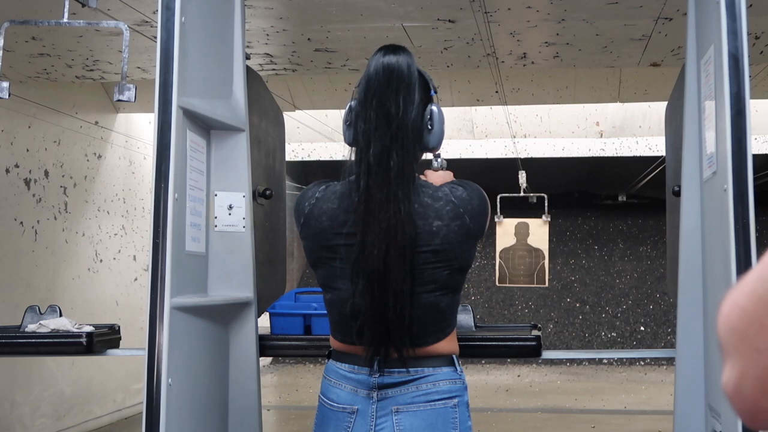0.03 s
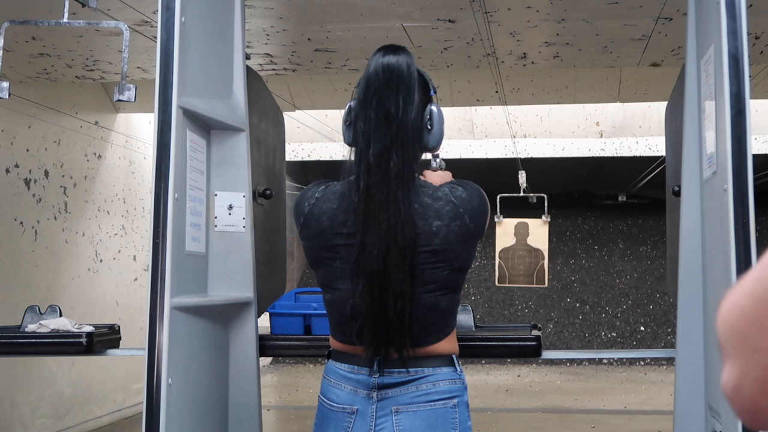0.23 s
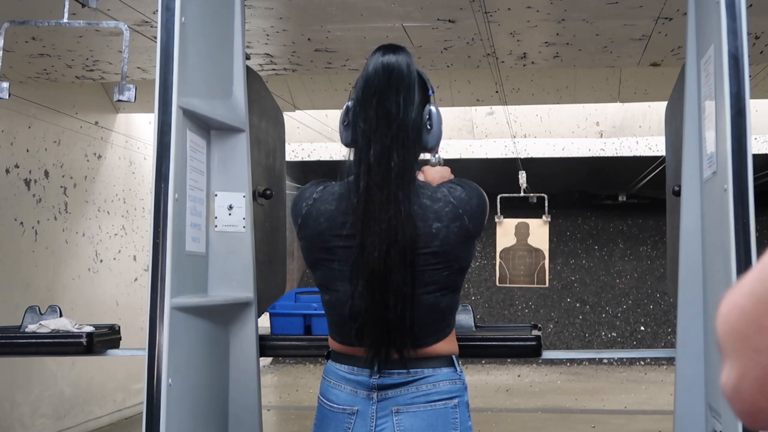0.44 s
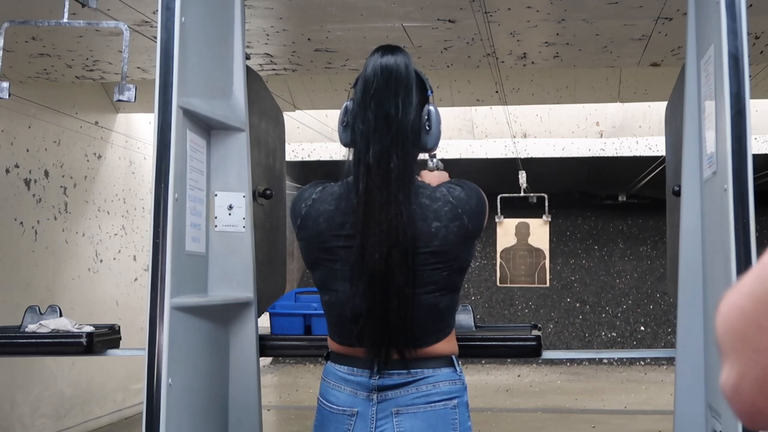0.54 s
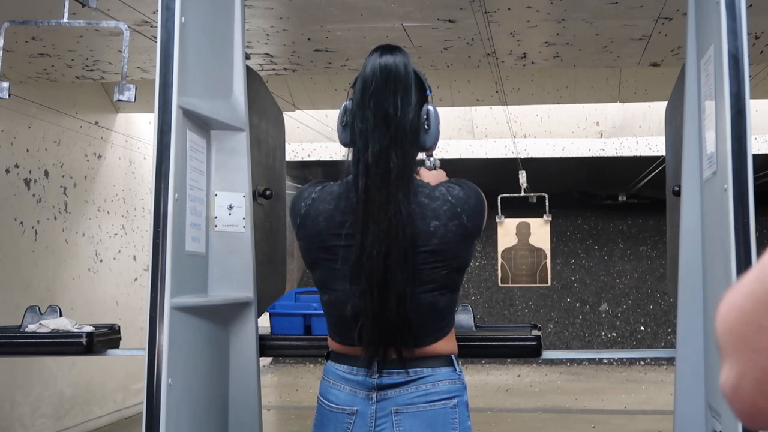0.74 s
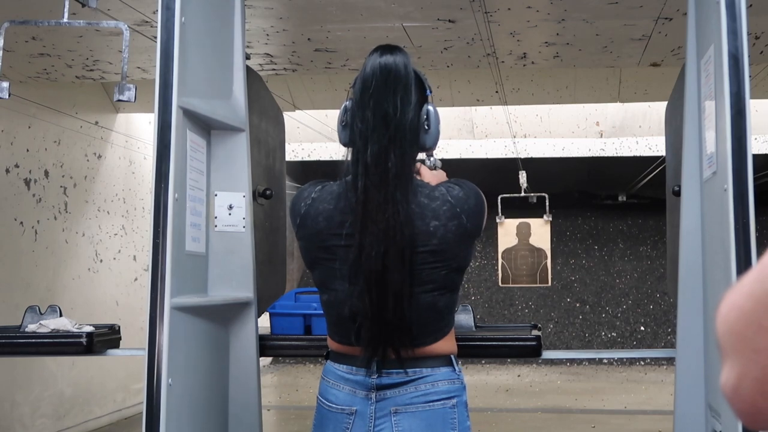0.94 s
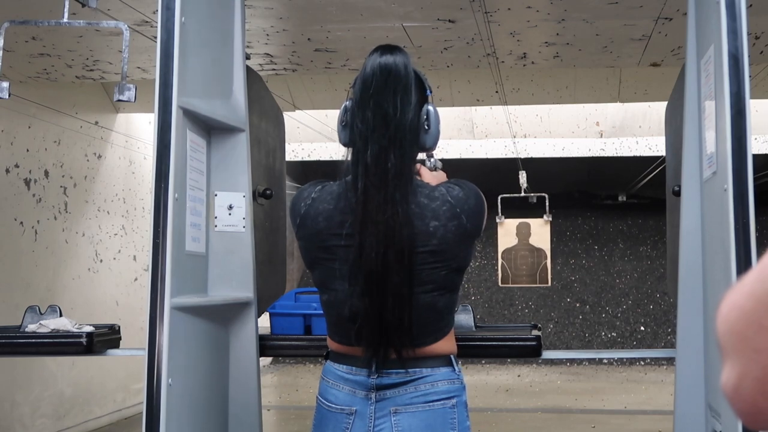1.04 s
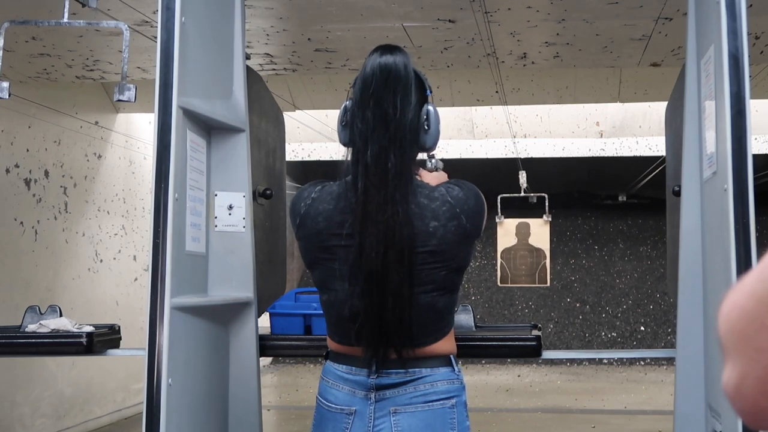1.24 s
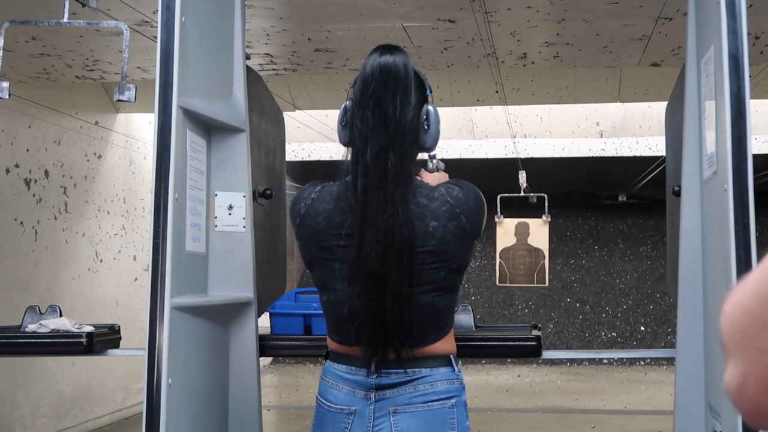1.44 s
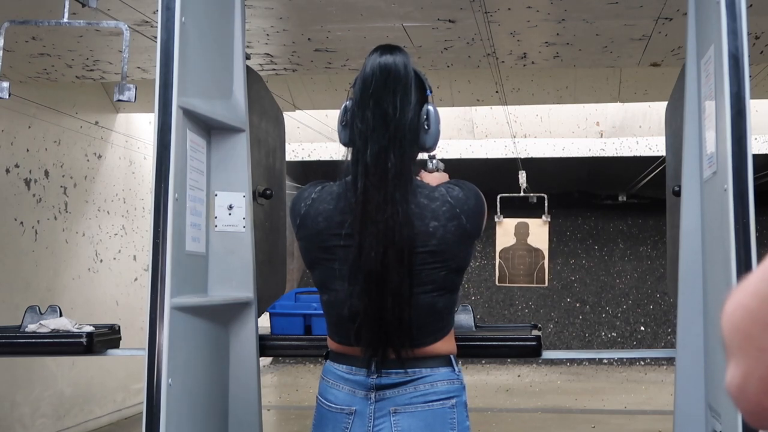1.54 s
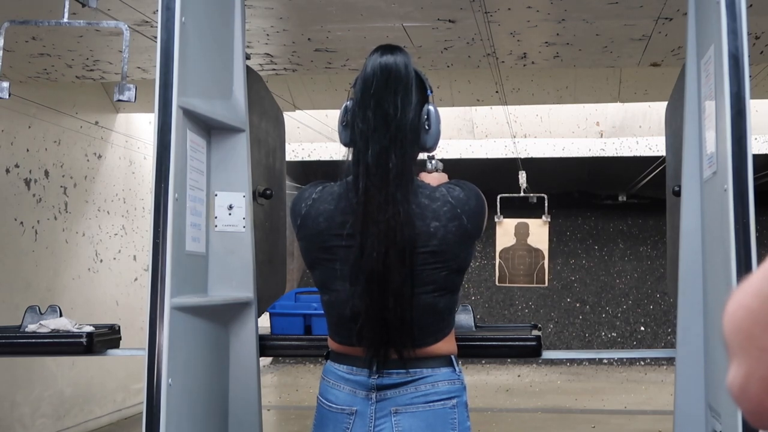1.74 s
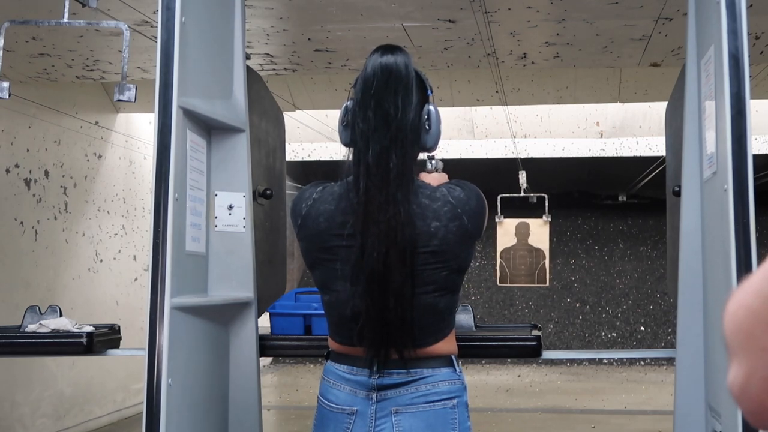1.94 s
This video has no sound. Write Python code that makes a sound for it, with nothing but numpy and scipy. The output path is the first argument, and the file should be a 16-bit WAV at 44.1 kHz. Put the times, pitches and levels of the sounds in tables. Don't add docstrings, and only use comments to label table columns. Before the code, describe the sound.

A single overloaded handgun shot cracks in a concrete indoor range, followed by a fading roar

```python
import sys
import numpy as np
from scipy import signal
from scipy.io import wavfile

SR = 44100
rng = np.random.default_rng(int(sys.argv[2]) if len(sys.argv) > 2 else 0)


def wrap_up_sound(samples):
    columns = np.atleast_2d(samples).T
    tamed = np.clip(columns, -1, 1)
    steps = np.round(tamed * 32767).astype(np.int16)
    wavfile.write(sys.argv[1], SR, steps)


def volts_from_db(level):
    exponent = np.asarray(level, float) / 20
    return 10 ** exponent


N = 88200

SHOT_S, CRACK_S = 0.3818, 0.0115
FLOOR_TOP_HZ = 8000
# hz, correlation [-1..1]
LIKENESS = [(200, 1), (400, 1), (700, 0.99), (1300, .9), (2400, 1), (4400, 0.26), (8000, -.4),
            (15000, 0.28)]


def rms_one(x):
    return x / np.sqrt(np.mean(x ** 2) + 1e-20)


def at_hz(points, hz, column=1):
    points = np.array(points)
    return np.interp(np.log(hz), np.log(points[:, 0]), points[:, column])


def drift(rate_hz):
    r = np.exp(-40 * np.pi * rate_hz / SR)
    white = rng.standard_normal(N // 20 + 2002)
    slow = signal.lfilter([1], [1, -2 * r, r * r], white)[2000:]
    return np.interp(np.arange(N) / 20, np.arange(len(slow)), rms_one(slow))


def ring(start_s, level_db, hz, t60_s):
    t = np.maximum(np.arange(N) / SR - start_s, 0)
    return volts_from_db(level_db - 60 * t / t60_s) * np.sin(2 * np.pi * hz * t)


def dying(start_s, t60_s, rise_s):
    t = np.arange(N) / SR - start_s
    rise = np.sin(np.pi / 2 * np.clip(t / rise_s, 0, 1)) ** 2
    return rise * volts_from_db(-60 * np.maximum(t, 0) / t60_s)


def band_pass(x, order, low_hz, high_hz):
    return signal.sosfilt(signal.butter(order, [low_hz, high_hz], "band", fs=SR, output="sos"), x)


def low_pass(x, hz):
    return signal.sosfilt(signal.cheby2(10, 40, hz * 1.1, fs=SR, output="sos"), x)


def narrow(x, hz):
    mid = x.mean(axis=0)
    return x - mid + low_pass(mid, hz)


def banded_noise(spectrum, likeness, patchy_db, shape=lambda hz: 1):
    out, power = 0, 0
    together = drift(25)
    edges_hz = 25 * 2 ** np.arange(0, 9.7, 0.5)
    white = rng.standard_normal((2, 2, N))
    for k, (low_hz, high_hz) in enumerate(zip(edges_hz, edges_hz[1:])):
        mid, side = band_pass(white[k % 2], 4, low_hz, high_hz)
        hz = np.sqrt(low_hz * high_hz)
        alike = np.clip(at_hz(likeness, hz), -1, 1)
        gain = volts_from_db(at_hz(spectrum, hz))
        power += gain ** 2 * (high_hz - low_hz) / SR * 4.4
        stereo = np.sqrt(1 + alike) * mid + np.sqrt(1 - alike) * side * [[1], [-1]]
        flicker = volts_from_db(patchy_db * (1.04 * together + drift(45)))
        out = out + gain * shape(hz) * flicker * stereo
    return out / np.sqrt(power)


def ventilation():
    # hz, level_db_per_hz
    air_spectrum = [(20, -17.5), (144, -8), (301, -16), (761, -19.5), (1160, -28), (4000, -37.5),
                    (7000, -49), (12000, -49.5)]
    # hz, level_db_per_hz
    hiss_spectrum = [(1500, -30.5), (3000, -6), (8000, 2.5), (14500, -3), (17000, -37.5)]
    air_db, hiss_db, hiss_top_hz = -28, -46.5, 12000
    duct_hz, duct_width_hz, duct_db = 135, 8.3, -37.5
    gain_drop_db, recovery_db_per_s = -34, 5

    t = np.arange(N) / SR - SHOT_S
    gain_db = np.where(t < CRACK_S, 0, gain_drop_db + recovery_db_per_s * t)
    r = np.exp(-np.pi * duct_width_hz / SR)
    poles = [1, -2 * r * np.cos(2 * np.pi * duct_hz / SR), r * r]
    duct = rms_one(signal.lfilter([1, 0, -1], poles, rng.standard_normal(N)))
    air = volts_from_db(air_db) * banded_noise(air_spectrum, LIKENESS, patchy_db=0.37) + volts_from_db(duct_db) * duct
    hiss = volts_from_db(hiss_db) * narrow(banded_noise(hiss_spectrum, LIKENESS, patchy_db=1.5), hiss_top_hz)
    return hiss * (t < 0) + volts_from_db(gain_db) * narrow(air, FLOOR_TOP_HZ)


def thuds():
    # start_s, burst_db, tail_t60_s, boom_hz, boom_db
    hits = [
        (0.187, -29.5, 0.9, 140, -14),
        (0.209, -31.5, 0.6, 132.5, -16),
        (.289, -24.5, 0.59, 882, -17),
        (0.326, -37, 0.22, 140, -24),
        (1.126, -42, .3, 1700, -58),
        (1.2225, -36, 1.3, 232.4, -26.5),
        (1.25, -89, .5, 135, -35.5),
        (1.6321, -55.5, 0.14, 902, -45),
    ]
    # hz, level_db_per_hz
    thud_spectrum = [(100, -22), (250, 6), (1200, -8.5), (2300, -11), (4500, -27.5), (7000, -38),
                     (14000, -43)]
    # hz, level_db_per_hz
    far_spectrum = [(40, -32), (113, -10), (349, -0.5), (955, -14.5), (2450, -13.5), (5500, -28),
                    (9000, -34), (15000, -48)]
    tail_db, head_t60_s, boom_cycles = -11, 0.15, 30
    far_s, far_db, far_t60_s = 1.842, -46, 1.2
    far_boom_hz, far_boom_db = 108.5, -39.5

    bursts, booms = 0, 0
    for start_s, burst_db, t60_s, boom_hz, boom_db in hits:
        tail = volts_from_db(tail_db) * dying(start_s, t60_s, 0.0049)
        head = dying(start_s, head_t60_s, 0.00033)
        bursts = bursts + volts_from_db(burst_db) * (tail + head)
        boom = ring(start_s, boom_db, boom_hz, boom_cycles / boom_hz)
        booms = booms + boom * dying(start_s, 100, 3.4 / boom_hz)
    wash = banded_noise(far_spectrum, LIKENESS, patchy_db=1.5)
    far = volts_from_db(far_db) * dying(far_s, far_t60_s, 0.002) * wash
    far_boom = ring(far_s - 0.004, far_boom_db, far_boom_hz, 0.19)
    body = banded_noise(thud_spectrum, LIKENESS, patchy_db=1.0)
    return narrow(bursts * body + booms + far + far_boom, FLOOR_TOP_HZ)


def case():
    # start_s, tick_db, ring_db
    bounces = [
        (1.126, -46.5, -82),
        (1.2233, -43.5, -95),
        (1.4919, -69, -66.5),
        (1.528, -77, -70),
        (1.6327, -53.5, -81),
        (1.688, -58, -73.5),
        (1.844, -55, -78),
        (1.864, -58.5, -84),
    ]
    # hz, level_db, t60_s
    brass_modes = [
        (11430, 6.5, 0.6),
        (11500, -1, .5),
        (11000, -20, .3),
    ]
    tick_low_hz, tick_top_hz, tick_t60_s, tick_width = 1100, 5000, 0.08, 0.3
    left_db, right_db, tumble_db = 1.5, -14, 3.5

    mid, side = band_pass(rng.standard_normal((2, N)), 3, tick_low_hz, tick_top_hz)
    strikes, rings = 0, 0
    for start_s, tick_db, ring_db in bounces:
        strikes = strikes + volts_from_db(tick_db) * dying(start_s, tick_t60_s, 0.0012)
        for hz, level_db, t60_s in brass_modes:
            rings = rings + ring(start_s, ring_db + level_db, hz, t60_s) * dying(start_s, 100, 0.002)
    ticks = (mid + tick_width * side * [[1], [-1]]) * strikes
    tumble = volts_from_db([left_db + tumble_db * drift(34), right_db + tumble_db * drift(18)])
    return narrow(ticks, 13000) + rings * tumble


def hall():
    # start_s, left_db, right_db
    wall_slaps = [
        (0.4261, -17.5, -30),
        (0.4343, -0.5, -6.5),
        (0.4371, -4.5, -13.5),
        (0.4437, -12.5, -8.5),
    ]
    # left_hz, right_hz, level_db, t60_s
    slap_modes = [
        (388, 400, -3, 0.17),
        (313.2, 240, -5, 0.078),
        (140, 140, -11.5, 0.15),
    ]
    # hz, level_db_per_hz
    roar_spectrum = [(30, -26), (100, -15), (444, -1), (810, -2.5), (1210, -12), (3300, -10), (4300, -24.5),
                     (8000, -29.5), (15000, -46)]
    # hz, t60_s
    roar_t60 = [(40, .4), (130, 0.47), (300, 1.053), (600, 1.08), (1500, 0.94), (3200, 0.75), (5500, 0.44),
                (8000, 0.37), (13000, 0.37)]
    # hz, start_s, rise_s
    opens = [(60, .432, .004), (495, .445, 0.024), (1500, 0.4434, 0.027), (10060, .448, 0.0083)]
    # hz, close_s
    centre_closes = [
        (12000, .47),
        (9500, .5),
        (7800, .54),
    ]
    roar_db, roar_s = -12.5, 0.51

    slaps = np.zeros((2, N))
    for start_s, *side_db in wall_slaps:
        for *side_hz, level_db, t60_s in slap_modes:
            for c in range(2):
                slaps[c] += ring(start_s, side_db[c] + level_db, side_hz[c], t60_s)
    slaps = signal.sosfilt(signal.butter(2, 900, fs=SR, output="sos"), slaps)

    def shape(hz):
        start_s, rise_s, t60_s = at_hz(opens, hz), at_hz(opens, hz, column=2), at_hz(roar_t60, hz)
        return dying(start_s, t60_s, rise_s) * volts_from_db(60 * (roar_s - start_s) / t60_s)

    out = slaps + volts_from_db(roar_db) * banded_noise(roar_spectrum, LIKENESS, patchy_db=0.5, shape=shape)
    t = np.arange(N) / SR
    for hz, close_s in centre_closes:
        dull = narrow(out, hz)
        still_open = np.clip((close_s - t) / 0.03, 0, 1) * volts_from_db(np.minimum(5 * drift(12), 0))
        out = dull + still_open * (out - dull)
    return out


def shot():
    # hz, level_db_per_hz
    rattle_spectrum = [(120, -38.5), (200, -10.5), (10000, -14), (12100, -24.5), (13100, -19.5),
                       (16100, -28.5), (18000, -114)]
    crack_db, crack_rise_db, from_hz, to_hz = 3, 9, 3000, 2765
    wander, fizz_gain, body_gain = 0.15, 0.45, 0.72
    suck_s, push_s, blast_db = 0.0016, 0.003, 9
    rebound_db, rebound_s = -11, 0.005
    rattle_db, rattle_t60_s, mute_s = -9, 0.077, 0.034

    t = np.arange(N) / SR - SHOT_S
    part = np.clip(t / CRACK_S, 0, 1)
    hz = from_hz * (to_hz / from_hz) ** part
    tone = np.sin([np.cumsum(2 * np.pi * hz * np.exp(wander * drift(403.26)) / SR) for _ in range(2)])
    fizz = signal.lfilter([1, 1], [2], rng.standard_normal((2, N)))
    body = rms_one(band_pass(rng.standard_normal((2, N)), 2, 500, 2000))
    fade = np.clip((CRACK_S + suck_s + push_s * 1.6 - t) / push_s / 2, 0, 1) ** 2
    swell = volts_from_db(crack_db - crack_rise_db * (1 - part)) * (t > 0)
    crack = swell * fade * (tone + fizz_gain * fizz + body_gain * body)

    u = t - CRACK_S + suck_s / 2
    end_s = suck_s + push_s
    knots_s = [0, suck_s / 2, suck_s, suck_s * 1.1, suck_s + push_s * 0.7, end_s]
    blast = volts_from_db(blast_db) * np.interp(u, knots_s, [0, -1, -1, 1, 0.6, 0])
    late = np.maximum(u - suck_s - push_s, 0) / rebound_s
    rebound = -volts_from_db(rebound_db) * late * np.exp(1 - late)

    rattle = banded_noise(rattle_spectrum, [(200, 0.7), (3000, 0.25)], patchy_db=5.0)
    rattle = volts_from_db(rattle_db) * dying(SHOT_S + CRACK_S, rattle_t60_s, 0.0056) * rattle
    return (crack + blast + rebound + rattle) * np.clip((mute_s - t) / 0.018, 0, 1)


def scene():
    return ventilation() + thuds() + case() + hall() + shot()


def top_cut(x):
    return signal.sosfilt(signal.butter(12, 20000, fs=SR, output="sos"), x)


def record(dry):
    x = np.clip(dry, -1, 1)
    return top_cut(0.099 * x + 0.8 * low_pass(x, 16000))


dry = scene()
out = record(dry)
wrap_up_sound(out)
```